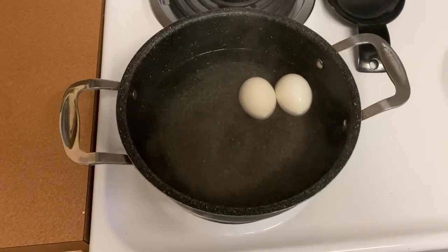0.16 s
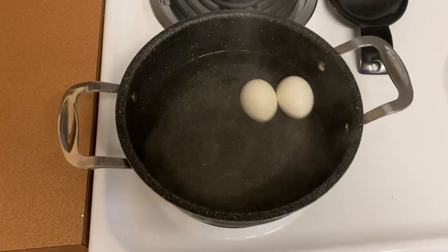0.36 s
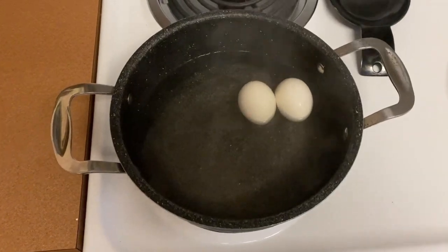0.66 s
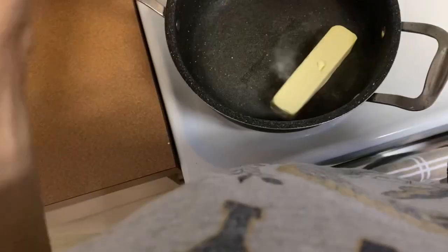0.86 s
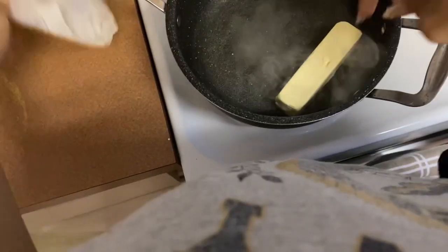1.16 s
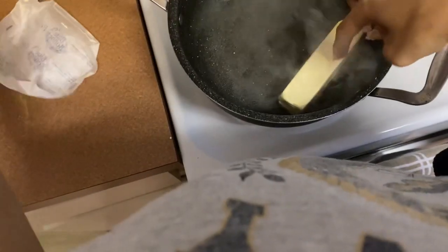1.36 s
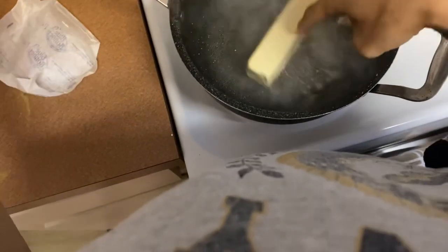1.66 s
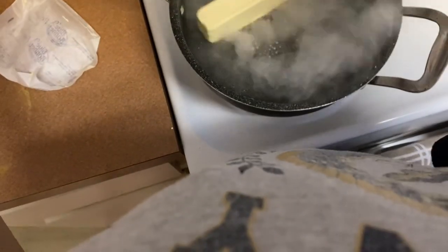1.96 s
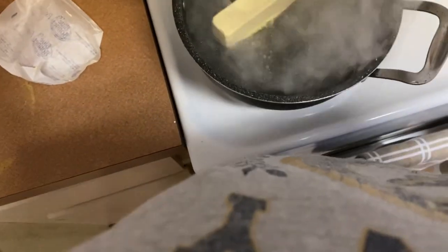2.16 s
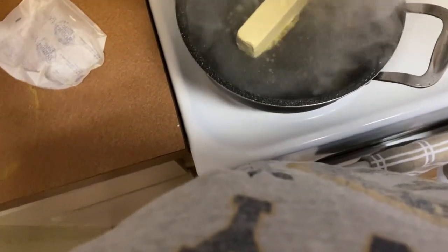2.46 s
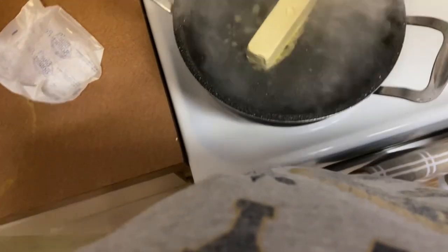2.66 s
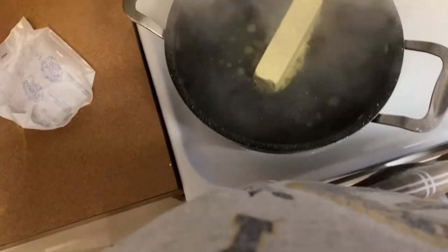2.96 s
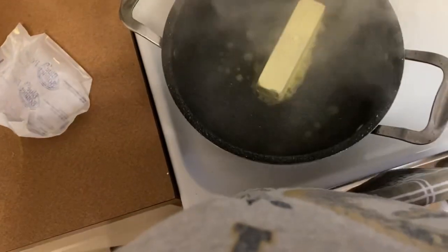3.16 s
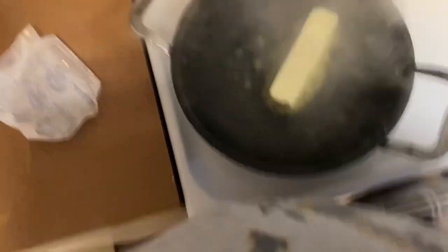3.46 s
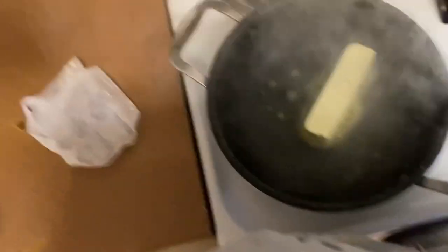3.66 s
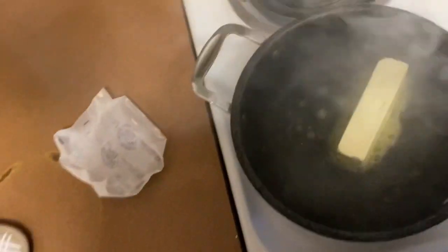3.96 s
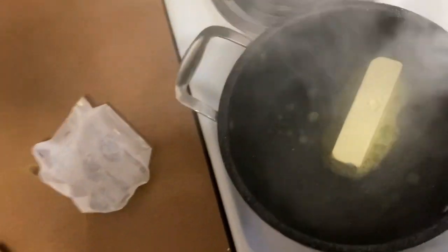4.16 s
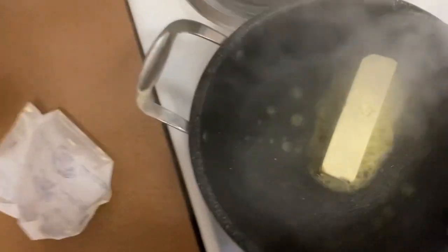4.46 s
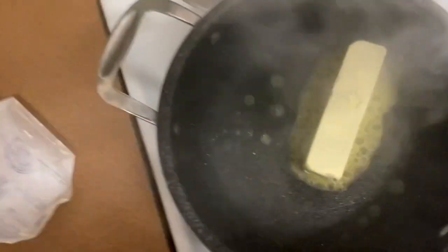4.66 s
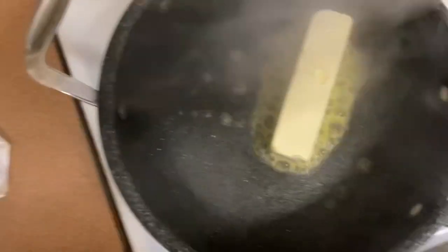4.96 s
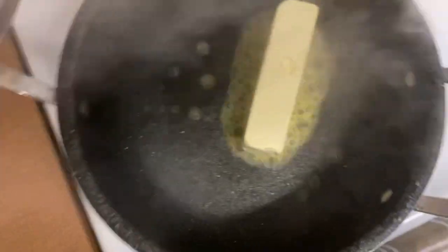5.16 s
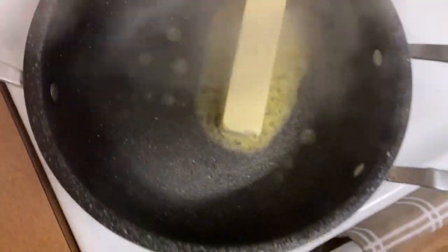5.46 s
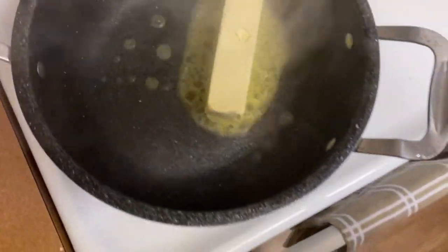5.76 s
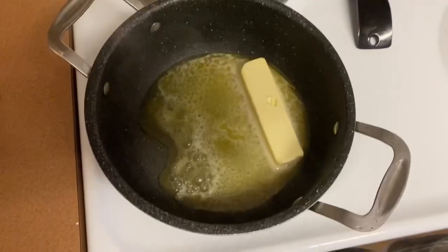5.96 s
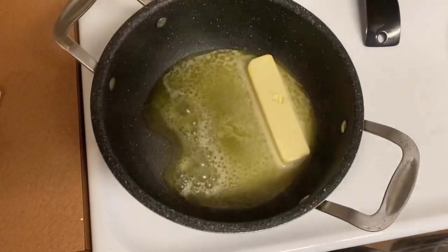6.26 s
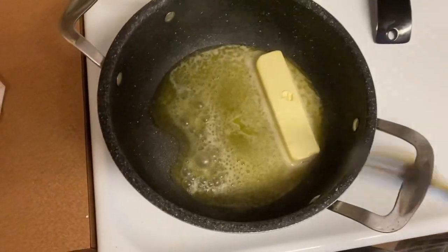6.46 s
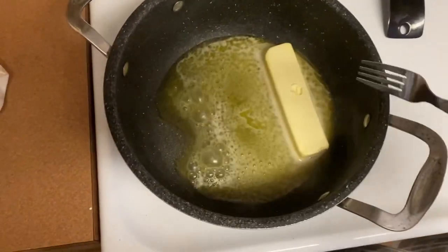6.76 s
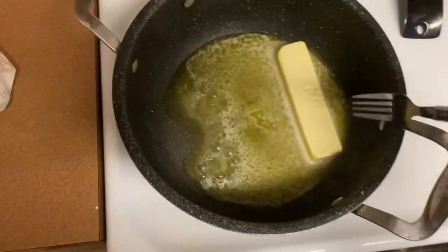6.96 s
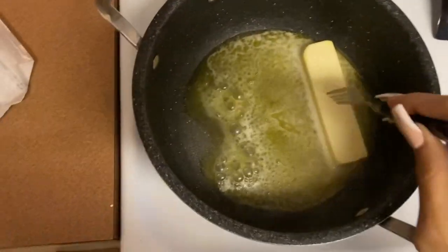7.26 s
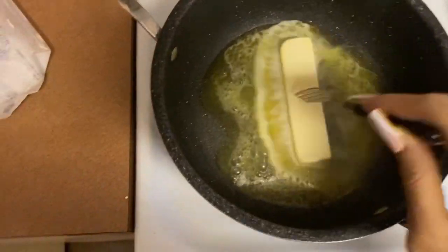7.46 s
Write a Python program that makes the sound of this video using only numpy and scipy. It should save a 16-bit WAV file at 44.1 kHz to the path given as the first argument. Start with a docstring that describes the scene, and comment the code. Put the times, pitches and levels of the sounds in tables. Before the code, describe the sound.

Close to a phone microphone in a kitchen, a brief faint simmer with chattering eggs gives way to the dense, high sizzle of butter melting in a hot metal pot. The butter knocks softly, and the sizzle swells with a slight whistling edge. After one sharp pop it drops to quiet bubbling and scattered spits, and a fork briefly sets the pot ringing. Electrical hum and motors drone steadily underneath.

```python
"""A kitchen in three moments joined by short fades. First eggs simmer quietly and rattle on the pot
floor. At 0.7 s a stick of butter hits a hot pot: thousands of tiny bubbles burst in a sizzle, the pot
rings along, and a finger pushes the butter with wet knocks. From 5.9 s it foams more gently and spits,
until a fork presses it down and sets the pot humming. Mains hum, motors and room noise drone on
throughout, and all is heard through the two microphone ports of a phone held close."""
import sys
import numpy as np
from scipy import signal
from scipy.fft import rfft, irfft, next_fast_len
from scipy.io import wavfile
from scipy.ndimage import uniform_filter1d

SR = 44100
rng = np.random.default_rng(int(sys.argv[2]) if len(sys.argv) > 2 else 0)


def digitize_waveform(pressure):
    """Quantize a signal to 16-bit integers and store it at the path in sys.argv[1].

    Rows of a 2-D input are taken as channels; values are limited to [-1, 1].
    """
    field = np.atleast_2d(pressure).T
    bounded = np.clip(field, -1, 1)
    quanta = np.round(bounded * 32767).astype(np.int16)
    wavfile.write(sys.argv[1], SR, quanta)


N = 335160
T = np.arange(N) / SR
# Simmer, sizzle and foam. Each row: start and end in seconds.
MOMENTS = [(0, .726), (.726, 5.9046), (5.9046, 7.6)]
MOMENT = np.searchsorted([end for _, end in MOMENTS[:-1]], T)
SIZZLING = MOMENT == 1

# The ride of the boil, a list per moment. Each row: time in seconds, small bubbles in dB per Hz,
# large bubbles in dB against them.
BOIL_LEVELS = [
    [(0.01, -113, 11.5), (0.71, -113, 12)],
    [(0.75, -76, -10), (1.0, -71.5, -11), (1.4, -73, -3), (1.55, -71, -4.5), (1.62, -67.5, -6),
     (1.74, -68.5, -5.5), (1.82, -71.5, -4.5), (2.15, -66.5, -9.5), (2.45, -69, -6.5), (3.0, -66, -6.5),
     (3.45, -68, -2.5), (3.68, -70.5, -1), (3.95, -66.5, -7), (4.1, -69.5, -1), (4.45, -66.5, -4.5),
     (4.7, -64.5, -7.5), (4.98, -64, -3), (5.15, -67.5, 1), (5.4, -66.5, -1), (5.88, -69.5, 1)],
    [(5.93, -89, 6), (6.3, -91.5, 8.5), (6.6, -91.5, 9.5), (6.7, -92, 10), (6.74, -90.5, 9),
     (6.8, -93.5, 12), (6.85, -92, 10), (6.95, -89, 9.5), (7.15, -89, 7.5), (7.35, -92, 11),
     (7.59, -93, 9.5)],
]
# The colour of the sizzle. Each row: time in seconds, lift of middling and of finest bubbles in dB.
SIZZLE_COLOUR = [(.75, 4, 4), (1.3, 3.5, 5), (1.65, -0.5, 7.5), (2.0, 1.5, 6), (2.5, 0.5, 4.5),
                 (2.9, 2.5, 3), (3.2, 1.5, 4.5), (3.5, 1, 6), (3.9, -1, 1), (4.3, 0.5, 0), (4.6, 0, -2.5),
                 (4.95, 0, 0.5), (5.3, -2, -0.5), (5.9, 1.5, 2)]
MIDDLING_DB, MIDDLING_FOLLOW = [1, -1.1, 6.5], 0.64  # against the small; how far they follow the large
PRESS_S, PRESS_RAMP_S, PRESS_DB = 7.42, 0.08, -7  # the fork presses down and quiets the middling bubbles

def bubble_levels():
    """How loud the large, middling, small and finest bubbles are as the boil rises and falls."""
    small_db, large_db = moment_curves(BOIL_LEVELS)
    tint_db, finest_db = SIZZLING * curves(SIZZLE_COLOUR)
    press_db = PRESS_DB * np.clip((T - PRESS_S) / PRESS_RAMP_S, 0, 1)
    middling_db = per_moment(MIDDLING_DB) + MIDDLING_FOLLOW * large_db + press_db + tint_db
    return small_db + np.array([large_db, middling_db, np.zeros(N), finest_db])


# The pitches in Hz of large, middling, small and finest bubbles.
SIZE_HZ = [3400, 5200, 10500, 14500]
# The tone between those pitches, a list per moment. Each row: pitch in Hz, relative level in dB.
BUBBLE_TONE = [
    [(1800, -100), (2500, -90), (4000, -99.5), (6000, -102), (8000, -104), (11000, -108), (15000, -113)],
    [(1800, -84), (2400, -83.5), (3300, -70), (3700, -72.5), (4400, -69), (5400, -63), (6500, -67.5),
     (8400, -67.5), (11000, -71.5), (14000, -63), (15500, -67)],
    [(1900, -90), (2650, -75), (3400, -80.5), (4400, -84.5), (5500, -73), (6500, -77.5), (7400, -69),
     (9300, -80.5), (11000, -84), (12500, -99), (13600, -100), (15500, -108)],
]
# The grain of each moment. Each row: bursts a second per band, spread of strength in dB, surge in dB.
BUBBLE_GRAIN = [(4995, 5.6, 0.49), (6502, 1.4, 0.59), (3405, 1.85, 1)]

def bubbles(sizes_db):
    """Bursting bubbles: each size rings a few cycles at its own pitch, and all surge together."""
    rate, spread_db, surge_depth_db = (per_moment(column) for column in np.transpose(BUBBLE_GRAIN))
    surge_db = surge_depth_db * (0.3 * walk(12) + walk(90))
    out = 0
    for hz in 1800 * 2 ** (np.arange(17) / 5.2):
        bursts = np.zeros((2, N))
        port, i = np.nonzero(rng.random((2, N)) < rate / SR)
        kick, strength = rng.standard_normal((len(i), 2)).T
        bursts[port, i] = kick * undb(spread_db[i] * np.clip(strength, -2, 2)) / np.sqrt(rate[i])
        share = np.array([at_pitch(list(zip(SIZE_HZ, one)), hz) for one in np.eye(4)])  # nearest sizes
        tone_db = per_moment([at_pitch(row, hz) - share @ at_pitch(row, SIZE_HZ) for row in BUBBLE_TONE])
        band_db = share @ sizes_db + tone_db + 10 * np.log10(hz / 7)  # summed over the band's width
        flicker_db = 1.75 * walk(23) + 0.34 * walk(5)
        out += undb(band_db + surge_db + flicker_db) * widen(ring(bursts, hz, hz / 4.06), hz)
    return out


# The pot wall's modes. Each row: pitch in Hz, width in Hz, dB above the large bubbles' level per Hz.
WALL_MODES = [(2977, 230, 19), (3270, 90, 11), (3660, 115, 18), (3940, 140, 16.5), (5350, 300, 17)]

def pot_wall(large_db):
    """The pot wall rings with the large bubbles of the sizzle."""
    return SIZZLING * sum(undb(db + large_db + 1.5 * walk(4.97)) * stereo_band(hz, width_hz)
                          for hz, width_hz, db in WALL_MODES)


# A whistling edge on the sizzle. Each row: time in seconds, centre in Hz, level in dB.
MOUTH_GLIDE = [(1.9, 3610, -62), (2.6, 3600, -57), (3.5, 3620, -51), (4.2, 3710, -61), (4.7, 3960, -43),
               (5.0, 3920, -42), (5.12, 3490, -43), (5.27, 3050, -46), (5.45, 2970, -54), (5.9, 2980, -62)]

def pot_mouth(width_hz=450):
    """The pot's mouth focuses the sizzle into a narrow band, lower as the phone comes nearer."""
    centre_hz, db = curves(MOUTH_GLIDE)
    phase = 2 * np.pi * np.cumsum(centre_hz) / SR
    pair = np.array([walk(width_hz) * np.cos(phase) + walk(width_hz) * np.sin(phase) for _ in range(2)])
    mean_hz = np.mean([hz for _, hz, _ in MOUTH_GLIDE])
    return SIZZLING * undb(db + 2 * walk(12)) * widen(pair, mean_hz)


# Low knocks and pops; the loudest pop is a tick plus a low body.
# Each row: start in seconds, level in dB, first and last pitch in Hz, length in seconds.
KNOCKS_AND_POPS = [(0.29, -44, 750, 620, 0.005), (0.493, -40, 600, 500, 0.0063),
                   (3.537, -30, 900, 696, 0.005), (5.7567, -18.5, 3020, 1700, 0.00095),
                   (5.7577, -18.5, 950, 600, 0.0052), (5.856, -31, 800, 586, 0.0041)]

def pops(events):
    """Each pop is a few cycles of a tone that falls in pitch."""
    out = np.zeros(N)
    for start, db, first_hz, last_hz, length in events:
        progress = np.arange(int(length * SR)) / (length * SR)
        hz = last_hz + (first_hz - last_hz) * np.exp(-progress / 0.19)
        envelope = undb(db) * np.sin(np.pi * progress) ** 0.7
        i = int(start * SR)
        out[i:i + len(hz)] += envelope * np.sin(2 * np.pi * np.cumsum(hz) / SR)
    return out


# The loudest spits in the foam. Each row: start in seconds, level in dB, pitch in Hz.
LOUD_SPITS = [(5.975, -36, 2450), (6.1658, -33, 5330), (6.2194, -36, 2450), (6.3418, -31, 5630),
              (6.61, -37, 2900), (6.64, -39, 2800), (6.737, -45, 2540), (6.755, -36, 2600),
              (6.772, -39, 2550), (6.79, -40, 2650), (6.8583, -31, 5690), (6.905, -37, 2360),
              (6.961, -31, 5430), (7.0104, -34, 5120), (7.0578, -35, 2880), (7.085, -37, 2950),
              (7.1511, -30, 5190), (7.185, -33, 3000), (7.205, -37, 2950), (7.3646, -33, 5180),
              (7.5233, -34, 2310)]
FAINT_SPITS, FAINT_DB, FAINT_SPREAD_DB = 40, -48.5, 5

def spits():
    """The foam spits: ten-cycle pings with a spray of hiss, faint ones scattered among the loud."""
    start, end = MOMENTS[-1]
    when, size, tune, register = rng.random((FAINT_SPITS, 4)).T
    faint_s = start + when * (end - start - .05)
    faint_db = FAINT_DB + FAINT_SPREAD_DB * (2 * size - 1)
    faint_hz = np.where(register < .5, 2750, 5330) * (1.014 + 0.17 * tune)
    events = LOUD_SPITS + list(zip(faint_s, faint_db, faint_hz))
    pings = pops([(s, db, hz, 0.995 * hz, 10 / hz) for s, db, hz in events])
    spray = decays([(s, db - 9, .004) for s, db, _ in events])
    return pings + spray * noise_band(5100, width_hz=4500)


# The eggs' chatter. Each row: start in seconds, relative level in dB.
EGG_HITS = [(0.0243, -54), (0.1166, -58), (0.1755, -59), (0.2214, -55), (0.2788, -59), (0.3394, -55),
            (0.3955, -56), (0.4978, -56), (0.5794, -64), (0.6494, -51)]
# Its bright metal ring. Each row: pitch in Hz, width in Hz, level in dB.
EGG_HIT_MODES = [(4210, 270, -3), (5630, 420, -2), (8430, 380, 0), (10500, 3000, -3.5)]

def egg_rattles(decay_s=0.017):
    """Eggs chatter on the pot floor and ring a few bright modes."""
    chatter = decays([(s, db - 6.5, decay_s) for s, db in EGG_HITS])
    return chatter * sum(undb(db) * noise_band(hz, width_hz) for hz, width_hz, db in EGG_HIT_MODES)


# Wet knocks. Each row: start in seconds, level in dB, decay in seconds.
BUTTER_KNOCKS = [(1.2175, -32, .004), (1.2585, -38.5, 0.011), (1.308, -46, 0.0026)]
# The body of a knock. Each row: pitch in Hz, level in dB.
KNOCK_MODES = [(900, -1), (1400, 0), (2030, -2), (2480, -2)]

def butter_knocks():
    """A finger pushes the butter against the pot: a short knock with a wet splash of noise."""
    knock = sum(undb(db) * np.sin(2 * np.pi * (hz * T + rng.random())) for hz, db in KNOCK_MODES)
    return decays(BUTTER_KNOCKS) * (knock + noise_band(1750, width_hz=1900))


def fork(start_s=7.37, hz=1217, db=-42, rise_s=.03, decay_s=.07):
    """The pot hums briefly under the fork."""
    age = np.clip(T - start_s, 0, None)
    envelope = (1 - np.exp(-age / rise_s)) * np.exp(-age / decay_s)
    return undb(db) * envelope * np.sin(2 * np.pi * hz * T)


# The pot floor's modes. Each row: pitch in Hz, width in Hz, dB above the drone's or roar's level per Hz.
FLOOR_MODES = [(598, 54, 19), (802, 48, 22.5), (995, 32, 18.5), (1230.3, 23, 22)]
# Their faders. Each row: time in seconds, then a gain in dB for each of the four modes.
FLOOR_GAINS = [(0.8, 1, -4, 3, -9), (1.1, -2, 1, 5, 0), (1.35, -8, 0, 0, -2), (1.6, -8, -6, 5, 8),
               (1.95, -5, 4, -2, -5), (2.35, 1, -1, -4, -3), (2.7, -2, 1, -9, 3), (3.25, 2, 2.5, -9, 2.5),
               (3.9, 2, 2, -3, -1), (4.5, 0.5, -1, -13, -4), (5.2, -8, 0, -11, -10), (5.9, -10, -2, -8, -8)]

def pot_floor(drone_db, roar_db):
    """The pot floor rings under the sizzle, its modes swelling in turn."""
    out = 0
    for (hz, width_hz, db), gain_db in zip(FLOOR_MODES, curves(FLOOR_GAINS)):
        drive_db = drone_db if hz < 750 else roar_db
        out += undb(db + drive_db + gain_db) * stereo_band(hz, width_hz)
    return SIZZLING * out


# The ride of the hum, a list per moment. Each row: time in seconds, hum in dB, its octave in dB.
HUM_LEVELS = [
    [(0.01, -54, -77)],
    [(0.8, -32, -44.5), (2.5, -33, -44.5), (3.3, -32.5, -43.5), (4.7, -30.5, -41.5), (5.8, -31.5, -44)],
    [(5.97, -34, -39.5), (7.58, -31.5, -38.5)],
]
# The hum's buzz. Each row: multiple of the hum's pitch, level in dB against the hum.
HUM_PARTIALS = [(.5, -28.5), (1.5, -23), (3, -25), (4, -33)]

def mains_hum(hz=120):
    """Mains hum at a steady pitch, with its octave and weaker partials that waver in level."""
    hum_db, octave_db = moment_curves(HUM_LEVELS)
    phase = 2 * np.pi * hz * T
    buzz = sum(undb(db + 0.91 * walk(3.3)) * np.sin(k * phase) for k, db in HUM_PARTIALS)
    octave = undb(octave_db) * np.sin(2 * phase - 1.3)
    return np.sqrt(2) * (undb(hum_db) * (np.sin(phase) + buzz) + octave)


# The motor chord, a list per moment. Each row: pitch in Hz, level in dB.
MOTOR_TONES = [
    [(146.4, -48), (292.5, -51), (281.2, -62), (143.1, -62), (360.6, -66), (442, -66)],
    [(146.2, -46), (292.4, -50), (143.75, -51), (287.6, -52), (431.4, -53), (155.95, -48)],
    [(147.0, -45), (294.3, -51), (292.3, -52), (438.5, -50), (156.6, -52)],
]
# The swell of its highest tone. Each row: time in seconds, gain in dB.
TOP_TONE_SWELL = [(0, 0.5), (2.4, -2.5), (4.4, 0.5), (5.5, 6), (5.9, 4), (5.92, -1), (7.0, 0), (7.3, 2),
                  (7.6, 3)]

def motors():
    """Motors drone in slightly wavering tones; close pairs beat."""
    swell_db, = curves(TOP_TONE_SWELL)
    out = np.zeros(N)
    for (start, end), tones in zip(MOMENTS, MOTOR_TONES):
        playing = (T >= start) & (T < end)
        for hz, db in tones:
            phase = 2 * np.pi * (hz * T + rng.random() + 0.055 * walk(1.91))
            out += playing * undb(db + walk(3.28) + (hz > 400) * swell_db) * np.sin(phase)
    return np.sqrt(2) * out


# Dull swells and dips. Each row: centre and half length in seconds, then bass, drone and roar in dB.
AIR_SWELLS = [(1.2, .06, -1, 0, 0), (1.65, 0.17, -6, 3.5, 1), (2.4, 0.44, 0, 0.5, 1),
              (5.303, 0.21, -5, -1.5, -2), (3.526, 0.05, 15, 3.5, -0.5), (7.2, 0.2, 2, 1.5, -1)]
# Which of those three gains moves the bass, the low drone, the upper drone and the roar.
SWELL_ROUTING = [0, 1, 1, 2]
# The bed of each moment in dB per Hz: bass at 60 Hz, room drone at 560 Hz, pot roar at 1100 Hz.
BASS_DB, ROOM_DB, ROAR_DB = [-82, -73, -73.5], [-75, -70, -74], [-86, -76, -83.5]

def air_levels(damping_s=0.99):
    """Levels of bass, low drone, upper drone and roar; spreading fat damps the roar, then upper drone."""
    def damping(from_s):
        return SIZZLING * (1 - np.exp(-np.clip(T - from_s, 0, None) / damping_s))
    bass_db = per_moment(BASS_DB) + 3.5 * walk(4.12)
    room_db = per_moment(ROOM_DB)
    drone_db = room_db - 7 * damping(from_s=4.45)
    roar_db = per_moment(ROAR_DB) - 8.5 * damping(from_s=3.49)
    swells_db = sum(np.outer(np.array(gains_db)[SWELL_ROUTING], bell(s, half_s))
                    for s, half_s, *gains_db in AIR_SWELLS)
    return np.array([bass_db, room_db, drone_db, roar_db]) + swells_db


# The tone of room and pot noise, a list per moment. Each row: pitch in Hz, relative level in dB.
AIR_TONE = [
    [(30, -22), (70, -30), (110, -16), (200, -2), (300, -11), (500, 1), (620, -6.5), (780, -23),
     (900, -23.5), (1150, -22.5), (1350, -21), (1500, -23), (2600, -38.5)],
    [(30, -23), (60, -16.5), (100, -14.5), (200, -20.5), (270, -19.5), (330, -27.5), (400, -19.5),
     (480, -18.5), (650, -18), (900, -30), (1300, -26), (1800, -39), (2600, -32)],
    [(30, -20), (60, -15), (100, -12), (165, -14), (250, -12), (330, -19), (450, -17), (650, -17),
     (900, -27), (1300, -21), (1800, -27.5), (2600, -31)],
]

def air(bass_db, room_db, drone_db, roar_db):
    """Room drone and pot roar: third-octave bands of noise that flicker a little."""
    out = 0
    for hz in 32 * 2 ** (np.arange(20) / 3):
        level_db, anchor_hz = ((bass_db, 60) if hz < 105 else (room_db, 560) if hz < 450 else
                               (drone_db, 560) if hz < 750 else (roar_db, 1100))
        tone_db = per_moment([at_pitch(tone, hz) - at_pitch(tone, anchor_hz) for tone in AIR_TONE])
        band_db = level_db + tone_db + 10 * np.log10(hz / 4)  # summed over the band's width
        out += undb(band_db + 1.1 * walk(9.9)) * stereo_band(hz, hz / 3)
    return out


# Soft low thumps. Each row: centre in seconds, level in dB, pitch in Hz.
AIR_PUFFS = [(0.965, -58, 55), (1.01, -57, 55), (1.12, -49, 70), (1.17, -58, 55), (1.24, -56, 70),
             (3.18, -63, 60), (3.35, -63, 55)]

def puffs(half_s=.015):
    """Air puffs against the ports as the arm moves."""
    return sum(undb(db) * bell(s, half_s) * np.cos(2 * np.pi * hz * (T - s)) for s, db, hz in AIR_PUFFS)


def undb(db):
    """Decibels to amplitude."""
    return np.exp(np.asarray(db) * (np.log(10) / 20))


def at_pitch(table, hz):
    """Value of (Hz, value) rows on a log axis."""
    pitches, values = np.transpose(table)
    return np.interp(np.log(hz), np.log(pitches), values)


def per_moment(values):
    """One value for each moment, at every sample."""
    return np.asarray(values)[MOMENT]


def curves(table, t=T):
    """A curve over time for each value column of (seconds, values..) rows."""
    times, *columns = np.transpose(table)
    return np.array([np.interp(t, times, column) for column in columns])


def moment_curves(tables):
    """Curves from one table per moment, joined end to end."""
    spans = np.split(T, [round(end * SR) for _, end in MOMENTS[:-1]])
    return np.hstack([curves(table, t) for table, t in zip(tables, spans)])


def bell(centre_s, half_s):
    """A smooth rise and fall."""
    return np.exp(-.5 * ((T - centre_s) / half_s) ** 2)


def decays(events):
    """Sudden starts that die away, from (start in seconds, dB, decay in seconds) rows."""
    out = np.zeros(N)
    for s, db, decay_s in events:
        tail = out[int(s * SR):int((s + 8 * decay_s) * SR)]
        tail += undb(db) * np.exp(-T[:len(tail)] / decay_s)
    return out


def walk(rate):
    """Random levels held 1 / rate seconds and smoothed twice; spread near 1."""
    hold = int(SR / rate)
    steps = np.repeat(rng.standard_normal(N // hold + 1), hold)
    return 1.3 * uniform_filter1d(uniform_filter1d(steps, hold), hold)[:N]


def ring(x, hz, width_hz):
    """A resonance applied twice, scaled to rms 1."""
    b, a = signal.iirpeak(hz, hz / width_hz, SR)
    y = signal.lfilter(b, a, signal.lfilter(b, a, x))
    return y / np.sqrt(np.mean(y ** 2))


def noise_band(hz, width_hz):
    """Mono noise through a resonance."""
    return ring(rng.standard_normal(N), hz, width_hz)


def stereo_band(hz, width_hz):
    """Resonant noise, partly alike at the two ports."""
    return widen(ring(rng.standard_normal((2, N)), hz, width_hz), hz)


# Stereo width. Each row: pitch in Hz, side level in dB against the middle.
STEREO_WIDTH = [(60, -24), (200, -16), (400, -14), (650, -7.5), (1000, -1.5), (1300, -10.5), (1800, -13),
                (2400, -4.5), (3300, -10.5), (4500, -6), (5300, -7), (6300, -3.5), (15000, -5.5)]
OPPOSITE = np.array([[1], [-1]])

def widen(pair, hz):
    """One signal is common to the ports; the other reaches them with opposite signs."""
    return pair[0] + undb(at_pitch(STEREO_WIDTH, hz)) * pair[1] * OPPOSITE


# Width moves, a list per moment. Each row: time in seconds, side gain in dB for bass, low and upper mids.
WIDTH_GAINS = [
    [(0.01, 0, 13, 5), (0.71, 0, 13, 6)],
    [(0.75, 3, -9, -3), (1.2, 4, -9, -2), (1.4, 1, -8, -3), (2.3, 5, -10, -6), (3.2, 6, -8, -4.5),
     (3.4, 2, 0, 2), (4.1, 4, 1, 4.5), (4.8, 1, 6.5, 4.5), (5.88, 4, 11, 1)],
    [(5.93, 2, 6.5, -1.5), (7.59, 1, 7, -1.5)],
]
# Those three bands. Each row: lower and upper edge in Hz.
WIDTH_BANDS = [(1, 90), (560, 1200), (1200, 5200)]

def width_moves(side, hz):
    """The stereo image narrows and widens by band over time."""
    bands = np.array([below(high, hz) - below(low, hz) for low, high in WIDTH_BANDS])
    n = 2 * (len(hz) - 1)
    side_bands = irfft(bands * side, n)[:, :N]
    change = np.sum((undb(moment_curves(WIDTH_GAINS)) - 1) * side_bands, axis=0)
    return side + rfft(change, n)


def below(edge_hz, hz):
    """Gain of a steep low-pass."""
    return 1 / (1 + (hz / edge_hz) ** 12)


FADE_OUT_S, FADE_IN_S, FADE_IN_FLOOR = 0.0002, 0.025, 0.093

def scene():
    """The cooking over the kitchen's drone, dipping briefly where two moments meet."""
    bass_db, room_db, drone_db, roar_db = air_levels()
    mix = air(bass_db, room_db, drone_db, roar_db) + pot_floor(drone_db, roar_db)
    sizes_db = bubble_levels()
    mix += bubbles(sizes_db) + pot_wall(large_db=sizes_db[0])
    mix += mains_hum() + motors()
    mix += pops(KNOCKS_AND_POPS) + spits() + egg_rattles() + butter_knocks() + pot_mouth()
    mix += (fork() + puffs()) * np.array([[1], [-.6]])  # opposite in sign at the two ports
    for start, _ in MOMENTS[1:]:
        fade_out = (start - T) / FADE_OUT_S
        fade_in = FADE_IN_FLOOR + (T - start) / FADE_IN_S
        mix *= np.clip(np.where(T < start, fade_out, fade_in), 0, 1)
    return mix


# Left-right phase by pitch. Each row: pitch in Hz, lead of the left channel in radians.
STEREO_PHASE = [(0, 0), (1290, -0.4), (3010, 1.1), (3360, 0.7), (5250, 0.0), (6030, 1.6), (6550, 2.5),
                (6950, 3.1), (7850, 3.18), (8150, 3.5), (9130, 5.0), (9650, 5.85), (10100, 6.26),
                (10750, 6.3), (11200, 6.7), (12230, 8.2), (12750, 9.05), (13150, 9.4), (13900, 9.45),
                (14300, 9.8), (15330, 11.4), (16600, 12.5)]
# The balance. Each row: pitch in Hz, left minus right in dB.
STEREO_BALANCE = [(60, -1), (200, -1.5), (380, -3), (700, -2.1), (1300, -1.1), (2400, -1.1), (4400, 0),
                  (15000, 0)]
SCATTER_HZ, SCATTER_LIKENESS = 5800, .68  # higher sound arrives by many paths, only partly alike
TOP_HZ = 15720

def record(dry):
    """The treble spreads wide, its middle hollow near 7.4 and 13.5 kHz; the top is cut."""
    n = 2 * next_fast_len(N // 2 + 1)
    hz = np.arange(n // 2 + 1) * SR / n
    half_lead = np.interp(hz, *np.transpose(STEREO_PHASE)) / 2
    in_phase, crossed = np.cos(half_lead), np.sin(half_lead)
    mid, dry_side = rfft(np.array([dry[0] + dry[1], dry[0] - dry[1]]) / 2, n)
    direct = below(SCATTER_HZ, hz)
    likeness = direct + (1 - direct) * SCATTER_LIKENESS
    side = 1j * likeness * crossed * mid + (direct * in_phase + (1 - direct) * crossed) * dry_side
    balance = undb(np.outer([.5, -.5], at_pitch(STEREO_BALANCE, hz + 1)))
    stereo = irfft(balance * (in_phase * mid + width_moves(side, hz) * OPPOSITE), n)[:, :N]
    return signal.sosfilt(signal.ellip(16, .2, 80, TOP_HZ, fs=SR, output="sos"), stereo)


dry = scene()
out = record(dry)
digitize_waveform(out)
```